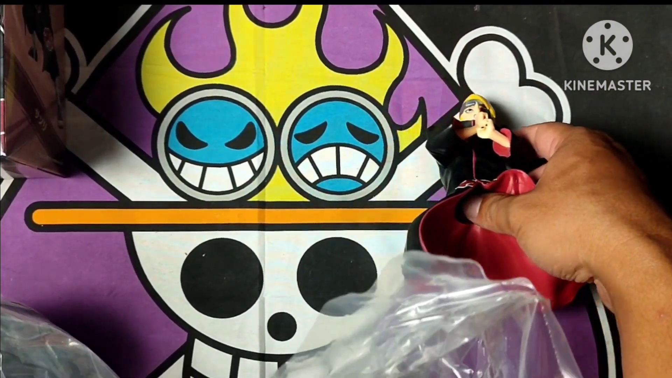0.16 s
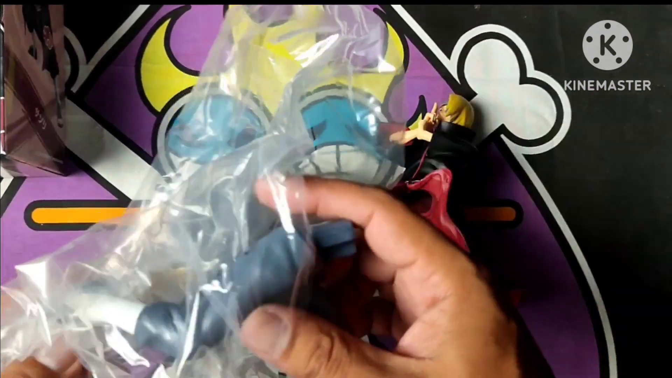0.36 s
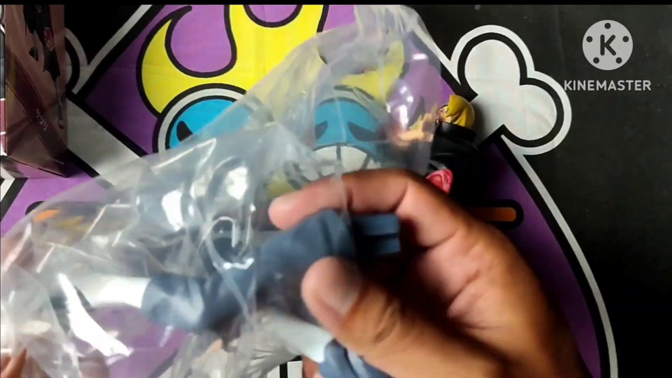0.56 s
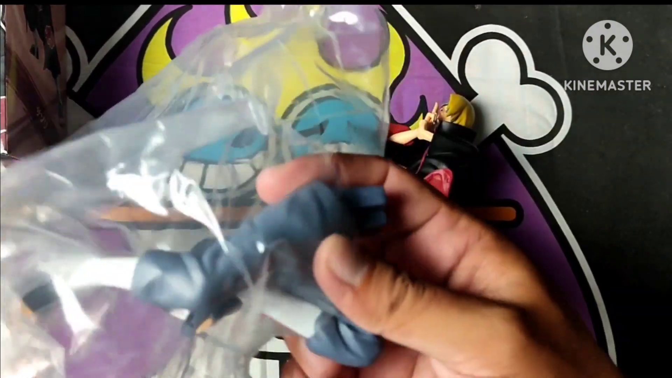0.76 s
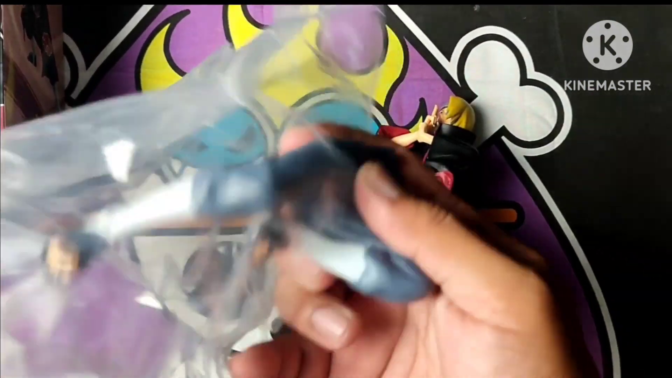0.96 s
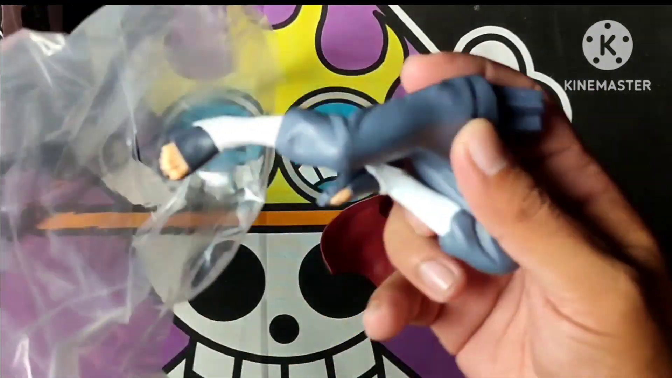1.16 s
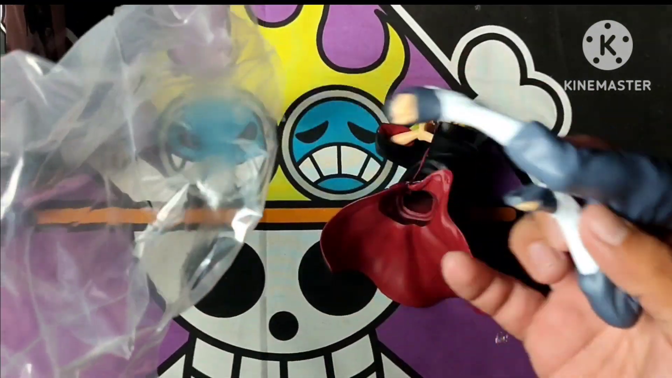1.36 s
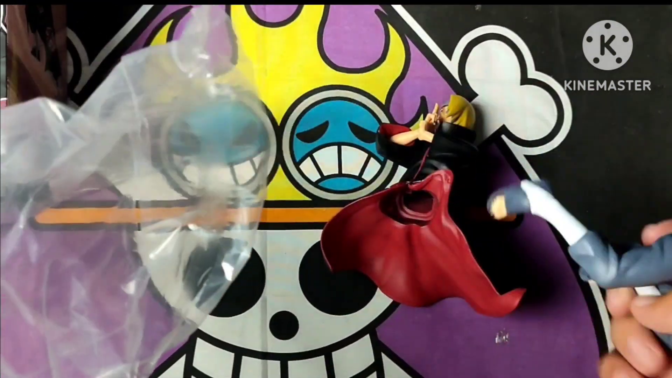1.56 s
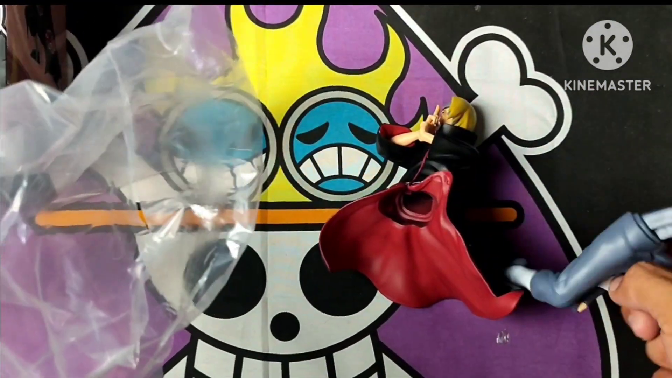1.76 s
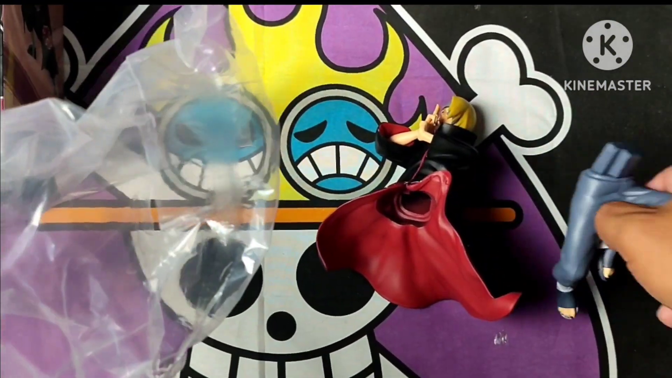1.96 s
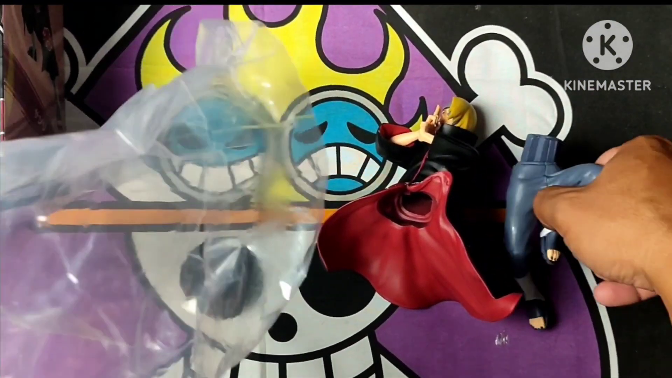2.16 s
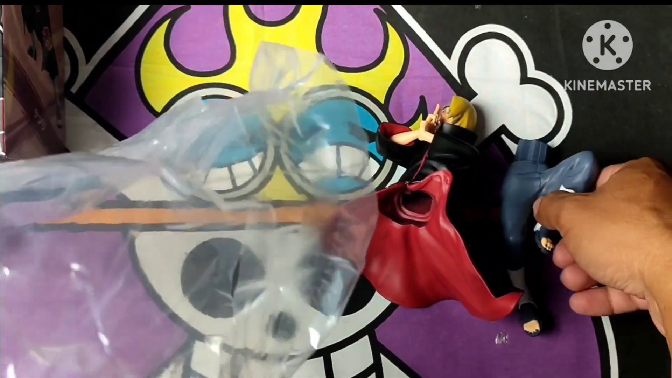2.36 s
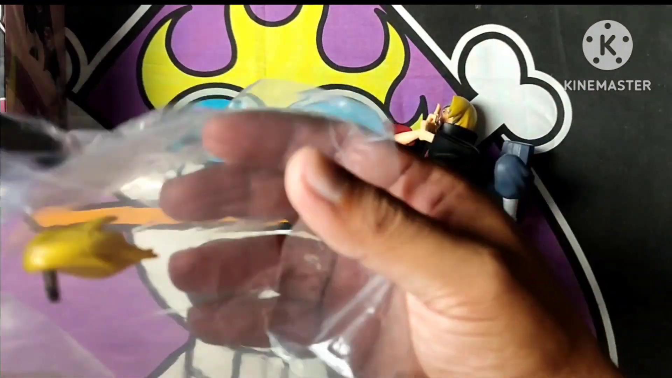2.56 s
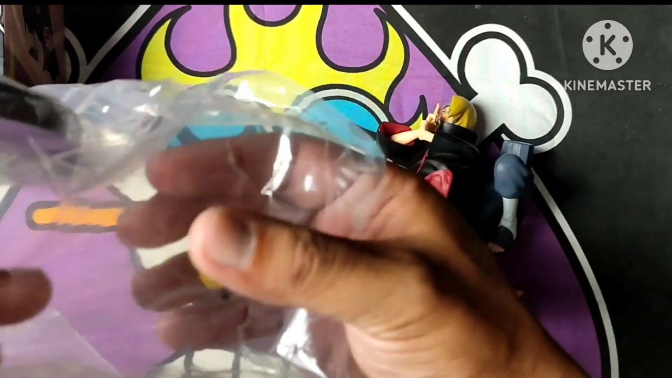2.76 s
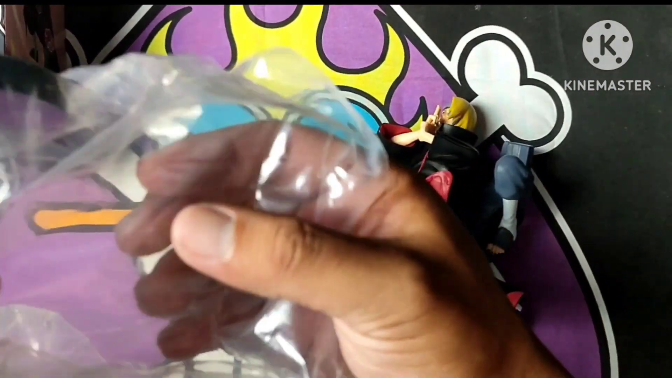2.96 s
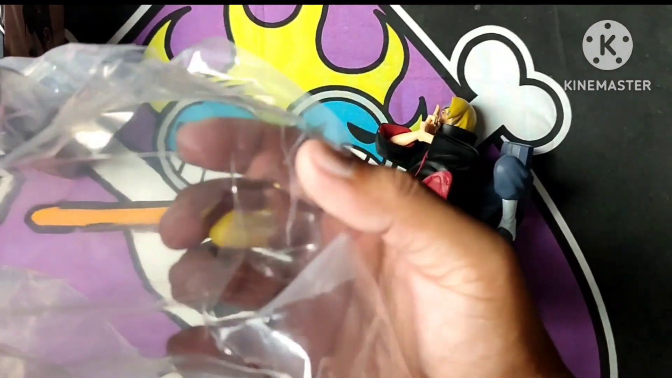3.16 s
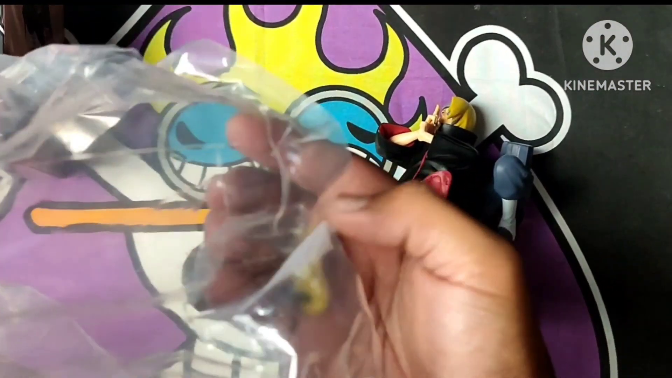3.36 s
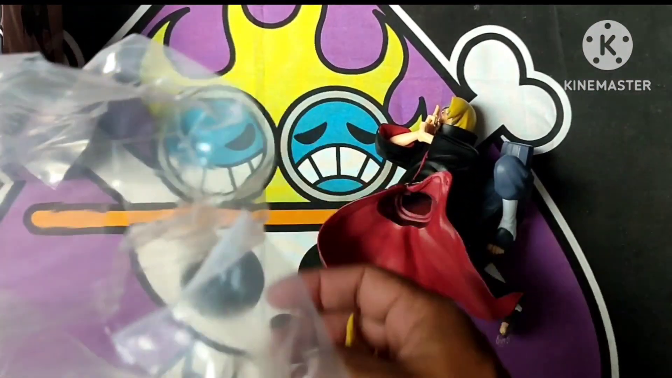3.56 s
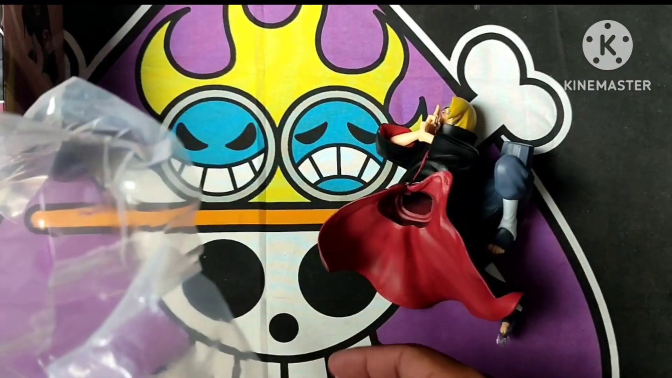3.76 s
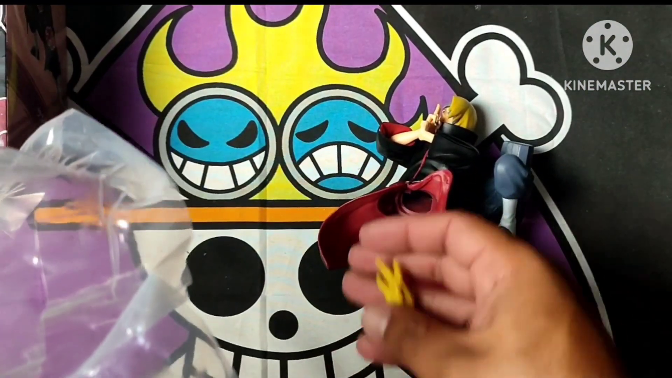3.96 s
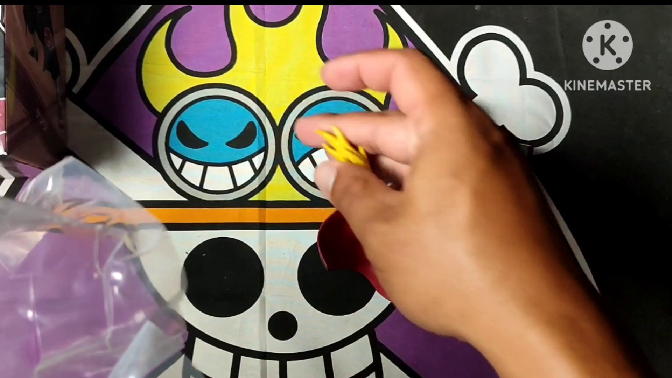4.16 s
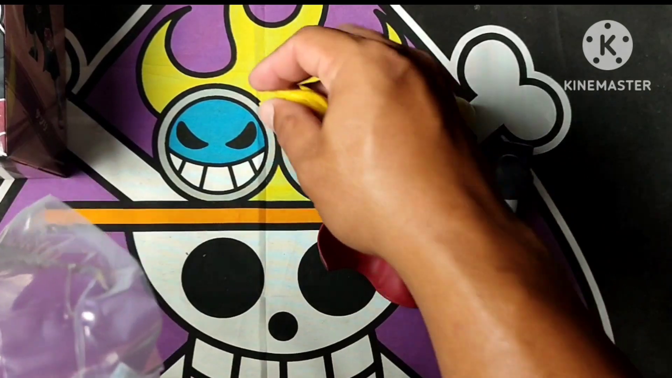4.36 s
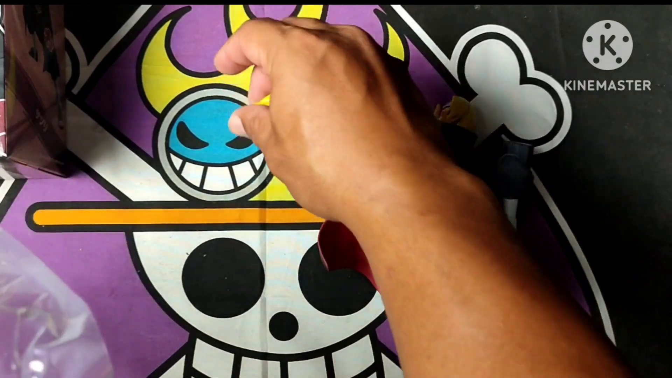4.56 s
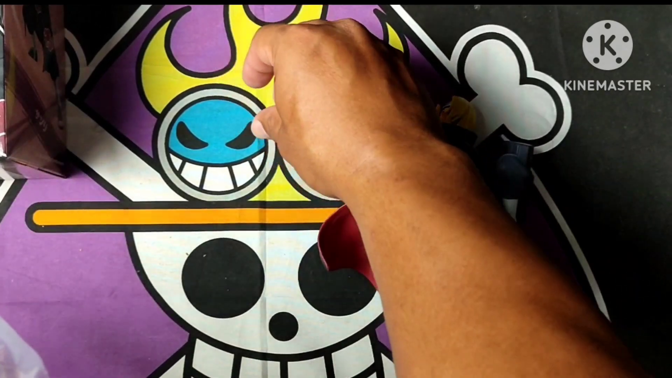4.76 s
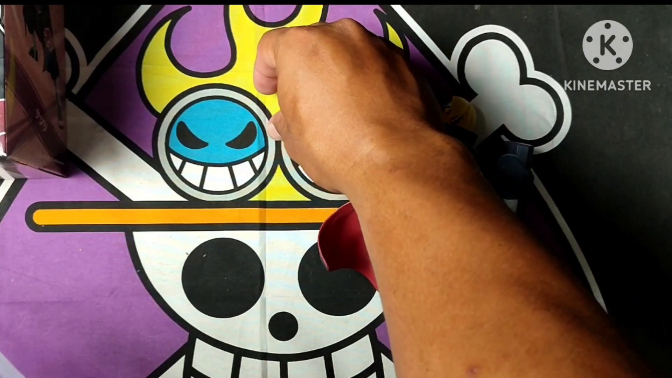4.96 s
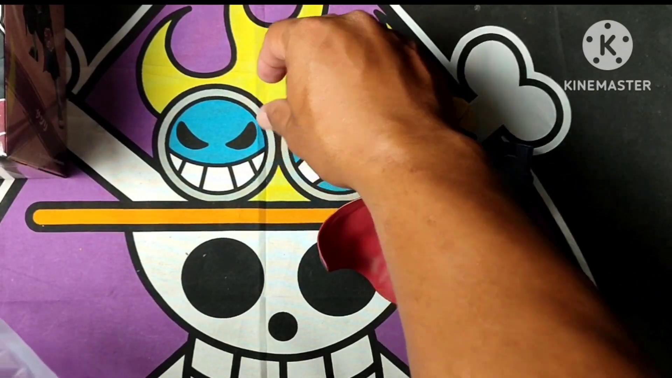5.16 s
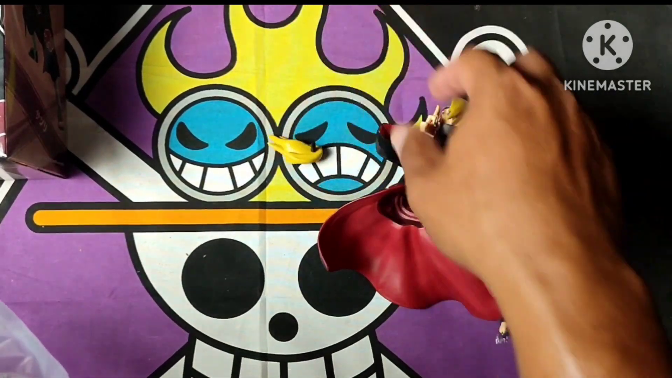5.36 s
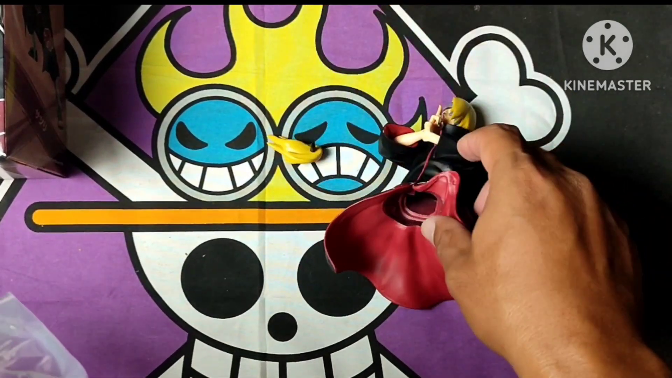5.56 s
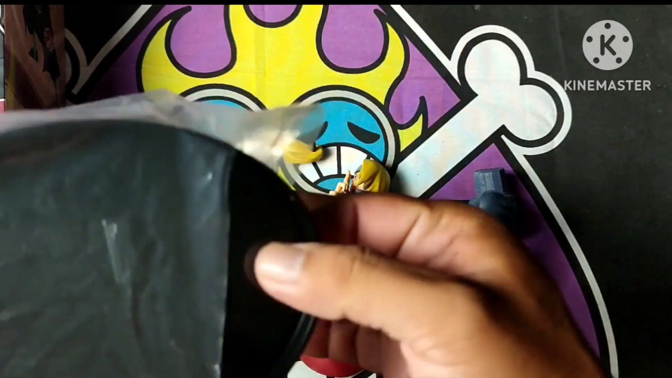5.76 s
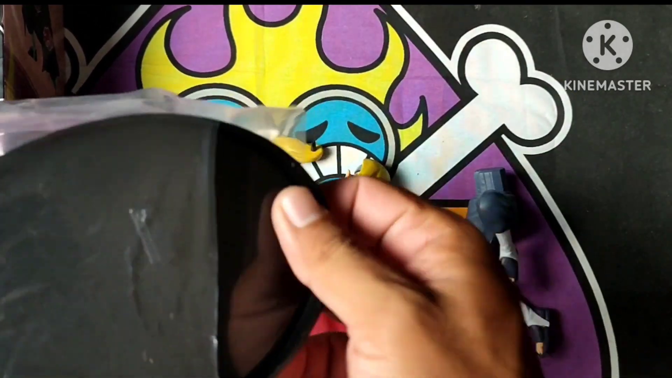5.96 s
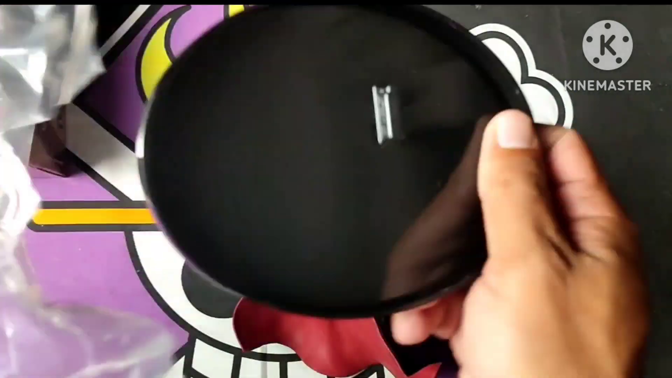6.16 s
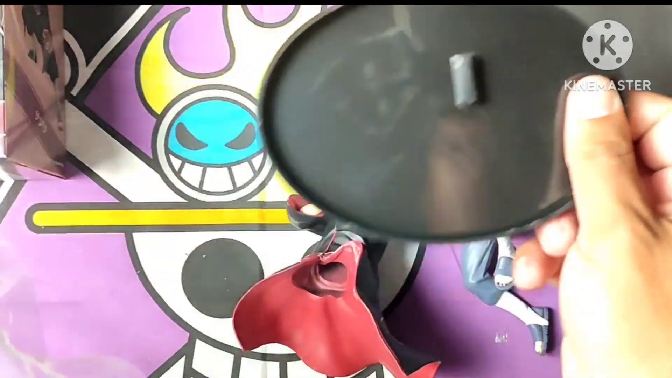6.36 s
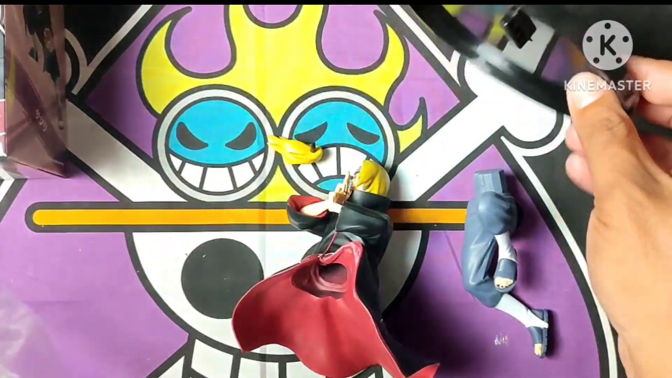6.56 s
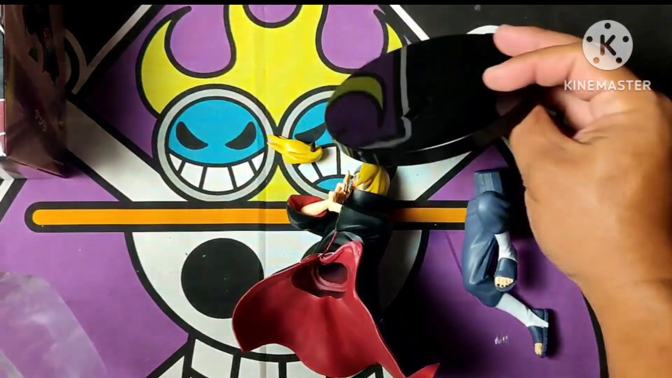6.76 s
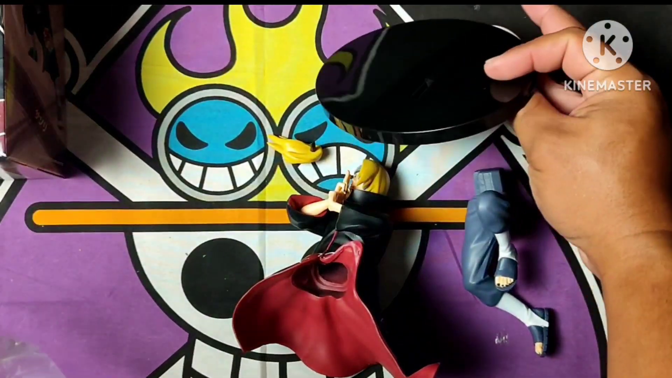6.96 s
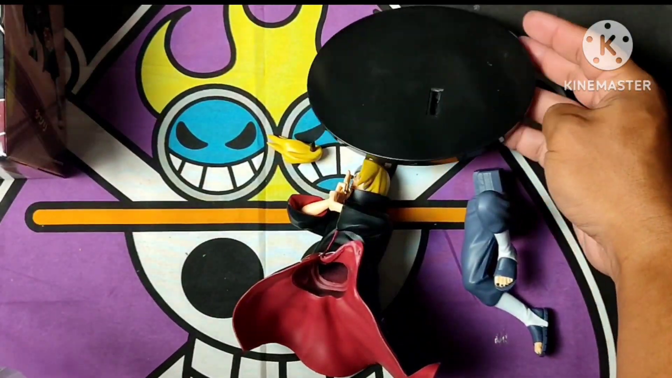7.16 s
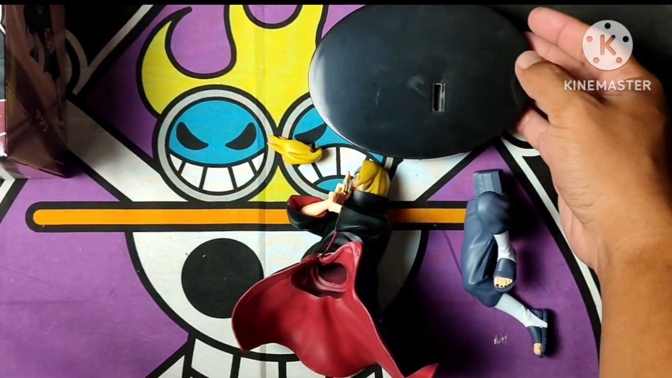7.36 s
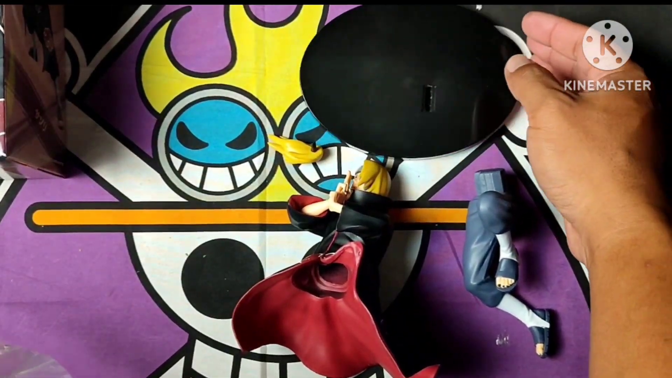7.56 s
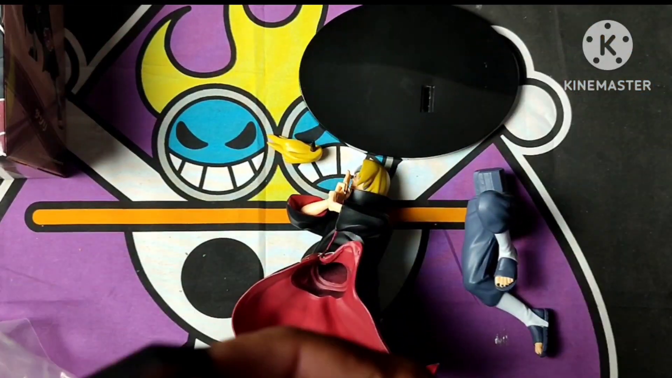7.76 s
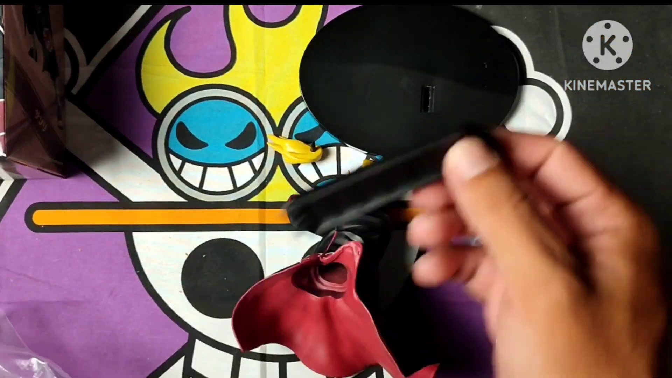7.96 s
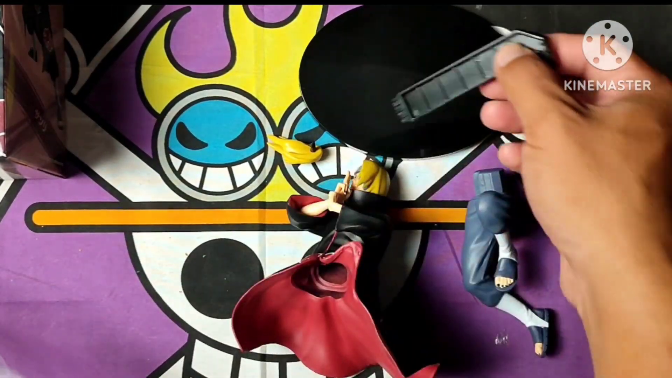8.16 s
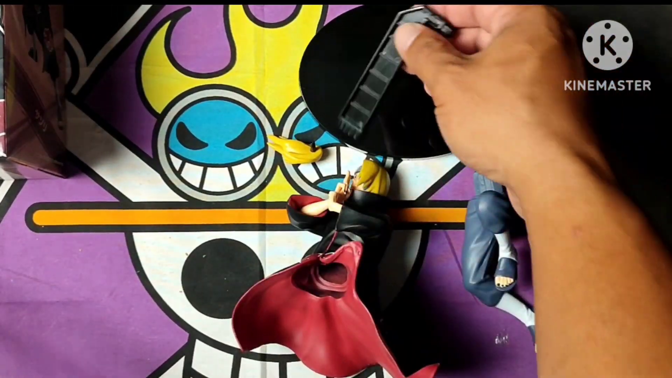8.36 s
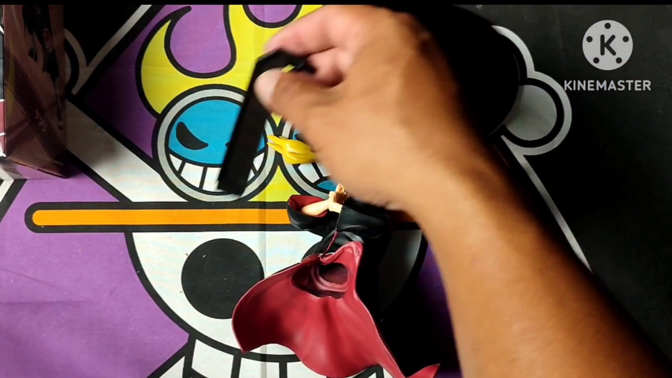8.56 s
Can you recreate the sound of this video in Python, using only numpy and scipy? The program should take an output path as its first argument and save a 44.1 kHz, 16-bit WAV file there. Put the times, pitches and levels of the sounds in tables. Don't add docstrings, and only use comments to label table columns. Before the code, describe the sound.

Indoors at a table, close and rough sound: bursts of snapping, ringing plastic film alternate with hard parts knocking a hollow tabletop. The loudest knocks distort and shake the microphone stand with a low boom. Midway it is calm, with only hiss, low rumble, a faint cricket and a small tap; later come clattering plastic, harsh bag crackle, a heavy disc thump and a last light crinkle.

```python
import sys
import numpy as np
from scipy import signal
from scipy.fft import rfft, irfft
from scipy.io import wavfile
from scipy.ndimage import uniform_filter1d

SR = 44100
rng = np.random.default_rng(int(sys.argv[2]) if len(sys.argv) > 2 else 0)


def voltage_ratio(level):
    return 10 ** (np.asarray(level, float) / 20)


def unload_wav(signal):
    wavfile.write(
        sys.argv[1],
        SR,
        np.round(np.clip(np.atleast_2d(signal).T, -1, 1) * 32767).astype(np.int16),
    )


N = 379701
TIME = np.arange(N) / SR

# frequency_hz, level_db (per Hz)
FILM = [(71, -2.5), (120, -5.5), (166, -6.5), (224, -1.5), (395, -2), (474, 1.5), (616, -9.5), (1130, -1),
        (1690, -2.5), (2250, -3), (4370, -6), (6200, -4), (7400, 1.5), (8690, -13.5), (13800, -8.5),
        (15000, -18)]
# low_hz, high_hz, rustle_layer, crease_layer (layers: 1 crisp, 2 body, 3 extremes)
ZONES = [(0, 750, 3, 0), (750, 1500, 2, 2), (1500, 2900, 2, 2), (2900, 5200, 1, 1), (5200, 8300, 1, 1),
         (8300, 20000, 1, 3)]


def level(x, db=0):
    return x * voltage_ratio(db) / np.sqrt(np.mean(x ** 2))


def colour(x, points, lo_hz=0, hi_hz=SR):
    hz = np.maximum(np.arange(4097) * SR / 8192, 1)
    point_hz, point_db = np.array(points).T
    db = np.interp(np.log(hz), np.log(point_hz), point_db)
    db = db - 10 * np.log10((1 + (lo_hz / hz) ** 6) * (1 + (hz / hi_hz) ** 6))
    cepstrum = irfft(db * np.log(10) / 20)
    cepstrum[1:4096] *= 2
    cepstrum[4097:] = 0
    impulse = irfft(np.exp(rfft(cepstrum)))[:4096]
    return signal.oaconvolve(x, impulse)[:len(x)]


def walk(rate):
    k = int(SR / rate)
    held = np.repeat(rng.standard_normal(N // k + 1), k)
    return 1.3 * uniform_filter1d(uniform_filter1d(held, k), k)[:N]


def echo(t60, wet_db):
    t = TIME[1:SR // 4]
    tail = rng.standard_normal(len(t)) * voltage_ratio(-60 * t / t60)
    return np.concatenate([[1], tail * voltage_ratio(wet_db) / np.sqrt(np.sum(tail ** 2))])


def smear(x, t60, wet_db):
    keep = voltage_ratio(-120 / (t60 * SR))
    energy = signal.lfilter([0, 1 - keep], [1, -keep], x ** 2)
    return x + voltage_ratio(wet_db) * np.sqrt(energy) * rng.standard_normal(len(x))


def ring(modes, push, rattle=0):
    t = TIME[:SR // 4]
    free = sum(-voltage_ratio(db - 60 * t / t60) * np.sin(2 * np.pi * f * t) for f, db, t60 in modes)
    struck = signal.fftconvolve(free + rattle, push)[:len(t)]
    return struck / np.abs(struck).max()


def background():
    # start_s, cricket_db, hiss_gain_db, rumble_db
    around = [(0.0, -51, 3.5, -45), (0.43, -50.5, -0.5, -49.5), (0.62, -75, 3.5, -40.5),
              (1.15, -58, -10, -50.5), (1.5, -60, -2, -48.5), (1.87, -56, -0.5, -46),
              (2.18, -55.5, -0.5, -46), (2.76, -67, 2.5, -47.5), (3.33, -60.5, -3, -46.5),
              (3.69, -56, 0.5, -41.5), (5.06, -52.5, 5, -47), (5.25, -58, -2, -52), (5.6, -55.5, -1.5, -44),
              (6.2, -76, -3, -52), (6.7, -56, 0, -45), (7.05, -56.5, 2, -41), (7.24, -60, 6.5, -47),
              (7.33, -57, 1.5, -46), (7.65, -49, 3.5, -45.5), (7.9, -62, 1.5, -48)]
    # frequency_hz, level_db (per Hz)
    hiss_spectrum = [(59, -33), (100, -2), (159, -8), (227, -1.5), (279, -9), (524, -10), (1460, -15.5),
                     (2690, -16.5), (4000, -20.5), (5150, -21.5), (5840, -15.5), (7670, -16), (8520, -29),
                     (13800, -19), (15000, -27.5)]
    rumble_spectrum = [(7.1, -19), (12, -16.5), (17, 11.5), (27, -12.5), (48, -9.5), (70, -11.5),
                       (160, -28.5), (210, -54), (350, -120)]
    # frequency_hz, level_db
    trill_partials = [(5238, -78), (5356, -77), (5480, -64), (5539, -67), (5599, -73), (5660, -71),
                      (5720, -62), (5780, -60), (5841, -73), (5900, -63), (5959, -67), (6019, -70),
                      (6140, -75), (6261, -74), (6320, -75)]
    s, *columns = np.transpose(around)
    cricket_db, hiss_db, rumble_db = (np.interp(TIME, s, c) for c in columns)
    hiss = level(colour(rng.standard_normal(N), hiss_spectrum), -54.5) * voltage_ratio(hiss_db + .8 * walk(6))
    rumble = level(colour(rng.standard_normal(N), rumble_spectrum)) * voltage_ratio(rumble_db + 1.33 * walk(3.42))
    drift = 0.34 * walk(19)
    trill = np.zeros(N)
    for hz, db in trill_partials:
        swell = 1 + 0.12 * walk(8.4)
        phase = 2 * np.pi * hz * TIME + 1.9 * rng.random() + drift + 0.53 * walk(31)
        trill += voltage_ratio(db) * swell * np.sin(phase)
    under = voltage_ratio(-12 + 2.0 * walk(9)) * np.sin(2 * np.pi * 2735 * TIME + 0.8 * walk(40))
    over = colour(rng.standard_normal(N), [(10300, -24), (11400, -9), (12500, -29)])
    over = level(over, -11.5) * voltage_ratio(2.5 * walk(13))
    return hiss + rumble + (level(trill) + under + over) * voltage_ratio(cricket_db)


THUMP_LAG_S = 0.00164


def rocking():
    # frequency_hz, level_db, t60_s
    sway = [(50.4, 3, 0.12), (80, 11, 0.11)]
    # start_s, peak_db
    shoves = [(0.104, -22.5), (1.073, -30), (1.285, -47), (1.79, -8), (1.82, -17), (1.897, -32),
              (2.267, -21), (2.442, -22), (5.543, -27), (5.56, -22), (7.218, -38), (7.269, -30),
              (7.521, -42), (7.661, -43)]
    out = np.zeros(N + SR)
    rock = ring(sway, np.hanning(300))
    for t0, db in shoves:
        out[int((t0 + THUMP_LAG_S) * SR):][:len(rock)] += voltage_ratio(db) * rock
    return out[:N]


def thumps():
    # start_s, peak_db, pitch_hz
    table_blows = [(0.105, -25.5, 118), (1.074, -26, 129), (1.285, -33, 323), (1.7806, -4, 161),
                   (1.79, -5.5, 205), (1.8184, -19.5, 194), (1.897, -27, 212), (1.914, -31, 130.8),
                   (2.267, -13.5, 292.5), (2.2768, -17, 208), (2.2826, -23, 261), (2.423, -30, 303),
                   (2.4314, 3.5, 212), (2.357, -38, 420), (2.4411, -9.5, 276), (3.851, -36, 192),
                   (5.055, -41, 323), (5.181, -25.5, 331), (5.19, -33, 300), (5.217, -11.5, 404),
                   (5.229, -18, 237), (5.266, -25, 238), (5.429, -39, 167), (5.5337, -23.5, 215),
                   (5.5426, -21.5, 195), (5.612, -28, 215),
                   (6.998, -1, 234), (7.089, -34.5, 223), (7.165, -38, 268), (7.218, -20.5, 240),
                  (7.243, -15, 217.4), (7.267, -21, 200), (7.4, -35, 167), (7.5218, -31.5, 225),
                  (7.547, -37, 190), (7.5525, -32, 189), (7.558, -27.5, 188), (7.635, -29, 231),
                  (7.648, -24.5, 295), (7.6603, -12.5, 257)]
    # ratio (to the thump pitch), level_db, t60_s
    table_modes = [(.85, -6, 0.14), (1.0, 4.5, 0.11), (1.2, 3.5, 0.046), (1.75, -7.5, 0.08),
                   (2.7, -12.5, 0.037), (3.6, -30, .05)]
    out = np.zeros(N + SR)
    for t0, db, thump_hz in table_blows:
        cycle = np.arange(0, 1, 1.73 * thump_hz / SR)
        push = np.sin(2 * np.pi * cycle) * (1 - 0.83 * cycle)
        shorter = 1 / (1 + 0.97 * voltage_ratio(2 * db))
        blow = voltage_ratio(db) * ring(np.array(table_modes) * [thump_hz, 1, shorter], push)
        out[int((t0 + THUMP_LAG_S) * SR):][:len(blow)] += blow
    return out[:N]


def rustle():
    # start_s, crinkle_db, slack_db (how far the film's low body joins in)
    pulls = [
        [(0.35, -38.5, -4), (0.415, -48.5, -1.5), (0.45, -39.5, -4), (0.535, -40.5, -4.5), (0.885, -34.5, -6),
         (0.97, -41.5, -11.5), (1.075, -37.5, 2), (1.184, -52.5, -1)],
        [(1.29, -54, 2), (1.378, -43.5, -10), (1.484, -43.5, -2.5), (1.54, -53, -4), (1.77, -49, 0.5)],
        [(2.53, -53, -1), (2.626, -35.5, -2.5), (2.794, -39.5, -11), (2.812, -46.5, -3.5), (2.936, -43, 0),
         (3.002, -58, 0)],
        [(5.66, -39, -5), (5.706, -45.5, -3), (5.775, -25, -3.5), (5.835, -27.5, -2.5), (5.9, -44, -4.5),
         (6.036, -39, -6.5), (6.196, -39, -4), (6.296, -54.5, 0)],
        [(7.705, -46, -16), (7.729, -43.5, -6.5), (7.913, -47, -7), (7.97, -82, -7)],
    ]
    # peak_s, crinkle_db, rise_s, fall_s, slack_db
    twitches = [(.13, -55, .01, .03, -15), (.316, -52.5, 1, .024, -4), (1.224, -48, 0.26, 0.11, -0.5),
                (1.27, -37, .024, 0.051, -6), (1.491, -35, .034, 0.12, -20), (1.61, -46, .4, .14, -14),
                (2.16, -38.5, 0.019, 0.12, -8), (2.34, -50, 0.47, 0.46, -2), (2.45, -38, 0.064, 0.087, -15),
                (3.132, -46, 0.45, 0.058, 0), (3.35, -54.5, 2, 0.31, -2), (3.426, -46.5, 0.054, 0.1, -6),
                (5.214, -46, 0.23, .004, 2.5), (5.671, -33.5, .05, 0.1, -8),
                (6.349, -39.5, .006, 0.24, -2.5), (6.392, -41, 0.22, 0.14, -4),
                (6.474, -44.5, .04, 0.21, -9), (7.054, -51.5, 0.67, 0.071, -13),
                (7.65, -48.5, 0.26, .004, -1), (7.71, -31, .02, 0.083, -22)]
    span_db = 40
    when, size, sign, *lean = rng.random((24000, 3 + len(ZONES))).T
    at = (when * N).astype(int)
    size_db = -2.8 * np.log(size + 0.01) + 0.7 * walk(60)[at] + 2.0 * walk(200)[at]
    size = np.sign(sign - .5) * voltage_ratio(size_db)
    swarm = np.zeros((4, N))
    for (lo, hi, layer, _), own in zip(ZONES, lean):
        lean_db = 16.4 * (own - .5) + 1.15 * walk(70)[at] + 2.27 * walk(18)[at]
        clicks = np.bincount(at, size * voltage_ratio(lean_db), N)
        swarm[layer] += colour(level(smear(clicks, 0.036, -1.2)), FILM, lo, hi)
    moves = list(pulls)
    for s, db, rise, fall, slack in twitches:
        moves.append([(s - rise, db - span_db, slack), (s, db, slack), (s + fall, db - span_db, slack)])
    out = np.zeros(N)
    for layer in (1, 2, 3):
        db = np.full(N, -150.)
        for s, crinkle_db, slack in map(np.transpose, moves):
            share_db = [0 * slack, slack, -1.5 + 1.21 * slack][layer - 1]
            move_db = crinkle_db + np.minimum(share_db, 4)
            db = np.maximum(db, np.interp(TIME, s, move_db, -150, -150))
        out += level(swarm[layer]) * voltage_ratio(db)
    return out


def creases():
    # start_s, peak_db, body_db (re peak)
    bag_creases = [(0.356, -26, -17), (0.388, -20.5, -26), (0.434, -19, -6), (0.463, -24.5, -33),
                   (0.543, -18.5, -26), (0.646, -21, -2), (0.7348, -21, -3.5), (0.7687, -25, -22),
                   (0.869, -18, -2), (0.9415, -23.5, -20), (0.981, -25, -9), (1.0261, -25, 0),
                   (1.074, -22.5, 0), (1.218, -29, -19), (1.2687, -31.5, -15), (1.342, -23, -8),
                   (1.391, -22, -9), (1.4266, -25.5, -12), (1.474, -34, -9), (1.4882, -19.5, -10),
                   (1.5593, -28.5, -4), (1.6018, -32, -15), (1.6541, -28, -4), (1.709, -31, -22),
                   (1.744, -27, -21), (1.782, -27, -10), (2.3003, -34, -15), (2.332, -19.5, -22),
                   (2.394, -25.5, -20),
                   (2.5336, -25.5, -24), (2.5965, -25, 3), (2.614, -19, -4), (2.674, -17.5, -5),
                     (2.718, -23.5, 1), (2.774, -24, -5.5), (2.884, -22.5, -3), (3.035, -31.5, 0),
                     (3.126, -26.5, -23), (3.269, -28.5, -13), (3.312, -31.5, -4), (5.219, -24.5, 4),
                     (5.668, -23, -3), (5.742, -20.5, -16), (5.7603, -20, -24), (5.865, -16.5, -24),
                     (5.9319, -23, -5), (5.9955, -20.5, -4.5), (6.027, -18, -9), (6.0628, -14.5, -13),
                     (6.1001, -19, 0), (6.1865, -16.5, 7), (6.3462, -27.5, -6), (6.4754, -20, -11.5),
                     (7.0293, -39, -6), (7.2434, -12, 4), (7.7076, -45, -19), (7.808, -23.5, -9),
                     (8.4883, -34, -5),
                   (0.3744, -25, -10), (0.3944, -28, -11), (0.5004, -25, -13), (0.5574, -22, -10),
                     (0.612, -24, -2), (0.6214, -29, -8), (0.6344, -24, -10), (0.69, -26, -10),
                     (0.6974, -23.5, -13), (0.7434, -25, -10), (0.7677, -24, -13), (0.8022, -27, -7),
                     (0.8137, -22, -13), (0.8334, -28, -6), (0.891, -21, -10), (0.8964, -19, -3),
                     (0.9884, -24.5, -15), (1.0621, -25, -7), (1.1478, -34, -10), (2.313, -23, -13),
                     (2.359, -28, -10), (2.5622, -31, -8), (2.613, -21, -17), (2.6364, -22, -8),
                     (2.6575, -20, -7), (2.7677, -27, -7), (2.7854, -24, -3), (2.841, -34, -10),
                     (2.9114, -28, -10), (2.9328, -30, -8), (2.9692, -32.5, -8), (5.7284, -26, 0),
                     (5.9736, -23, -1), (6.0055, -22, -14), (6.0384, -27, -10), (6.0764, -26, -4),
                     (6.1412, -25, -10), (6.3776, -28, -7)]
    crisp_s = [1.343, 3.1255, 6.4754, 7.7076]
    start_s, peak_db, body_db = np.transpose(bag_creases)
    crisp = np.abs(start_s[:, None] - np.array(crisp_s)).min(axis=1) < .005
    top_db = -12.5 + 0.1 * (peak_db + 25) + 15 * crisp
    shares_db = [None, 0 * peak_db, np.minimum(body_db, 0), np.minimum(top_db, 0)]
    age = TIME[:400]
    swell = (age + .0003) * np.exp(-age / 0.0012)
    snaps = rng.standard_normal((len(start_s), len(age))) * swell
    snaps /= np.sqrt(np.sum(snaps ** 2, axis=1, keepdims=True))
    out = np.zeros(N)
    for lo, hi, _, layer in ZONES:
        if not layer:
            continue
        snap_db = peak_db + shares_db[layer] + 1.75 * rng.standard_normal(len(start_s))
        if lo == 2900:
            snap_db = snap_db + .25 * (body_db + 8)
        bursts = np.zeros(N + 400)
        for s, db, snap in zip(start_s, snap_db, snaps):
            bursts[int(s * SR):][:len(snap)] += snap * voltage_ratio(db)
        impulse = 1. * (TIME[:2000] == 0)
        unit = .33 * np.linalg.norm(colour(impulse, FILM, lo, hi))
        zone_db = 1.0 - 1.47 * (hi < 6000)
        out += colour(smear(bursts[:N], 0.12, -6.5), FILM, lo, hi) * voltage_ratio(zone_db) / unit
    return out


def rings():
    # start_s, peak_db, pitch_hz
    cupped = [(0.4344, -23, 2670), (0.4623, -18.5, 3100), (0.5003, -25, 2930), (0.6903, -27, 1610),
              (0.7677, -24, 4580), (0.8345, -25, 1550), (0.8685, -27, 1140), (0.8914, -22, 4750),
              (0.9416, -29, 1760), (0.9797, -26, 2720), (0.9892, -26, 1540), (1.0266, -24, 4110),
              (1.063, -23, 1880), (1.3414, -39, 3370), (1.5584, -35, 1830), (2.5613, -31, 2460),
              (2.6125, -23, 2730), (2.674, -17, 3270), (2.7676, -30, 3640), (2.8876, -19.5, 4530),
              (2.9705, -28, 2720), (3.1243, -30, 1950), (5.7399, -21, 4040), (5.931, -24, 2650),
              (6.007, -25, 2080), (6.039, -25, 1310), (6.0993, -21, 2470), (6.1404, -29, 1030),
              (6.1842, -22, 1030), (6.3584, -28, 4720)]
    out = np.zeros(N)
    for t0, db, hz in cupped:
        t60 = 46 / hz
        tone = ring([(hz, 0, t60), (hz * 1.13, -4.0, t60)], rng.standard_normal(40))
        out[int(t0 * SR):][:len(tone)] += voltage_ratio(db - 4) * tone
    return out


def clacks():
    # frequency_hz, level_db, t60_s
    legs = [(1.783, -27, 0.21), (1.792, -26, 0.042), (1.856, -38, 0.07), (1.897, -39, 0.12),
            (2.269, -24.5, 0.52), (2.433, -12, 0.16), (2.442, -32, 0.17)], [(510, -4, .05),
            (803, -6, 0.059), (1025, -3, 0.033), (1390, 4, 0.027), (1710, 1, 0.035), (2240, -16, .03)]
    figure = [(5.184, -33, 0.5), (5.208, -25, 0.42), (5.22, -8.5, 0.061), (5.232, -20, 0.047),
              (5.2385, -29, .1), (5.267, -17, 0.095), (5.2705, -12, 0.11), (5.2735, -14, .1),
              (5.284, -38, .08), (5.4305, -21.5, 0.33)], [(706, -11, 0.057), (953, 5.5, 0.035),
              (1260, -10, 0.05), (1370, 2, 0.029), (1550, -10, .035), (1725, -3, 0.049), (1922, -9, 0.057),
              (2165, -5, 0.043), (2330, -19, 0.046), (3180, -17, .06), (4150, -13, 0.04)]
    disc = [(6.988, -42, 0.028), (7.0025, -31, 0.026), (7.231, -32, 0.054), (7.244, -8, 0.024),
            (7.268, -15.5, 0.1)], [(630, -11, 0.2), (773, -8, 0.054), (1068, -9, 0.19), (1180, -10, 0.1),
            (1300, -11, 0.11), (1430, 5.5, 0.07), (1683, -0.5, 0.17), (2100, -6, .13), (2180, -8, 0.22),
            (2650, 2.5, 0.049), (3170, -13, 0.14), (3820, -12, .05), (4840, -14, 0.1), (6920, -6, .07)]
    rim = [(7.001, -6, 0.23), (7.015, -31, 0.35), (7.028, -34, 0.18), (7.221, -26, 0.2), (7.656, -21, 0.25),
           (7.664, -25, .3)], [(485, -9, 0.099), (627, -1, .06), (778, 3.5, 0.036), (958, -7, 0.045),
           (1281, -4, .07), (1390, -3, 0.051), (2100, -21, .02)]
    chip = [(3.033, -30.5, 0.083), (3.853, -22, 0.033)], [(1630, 0, 0.042), (1720, 2, 0.037),
            (1880, 0, 0.034)]
    crowd_spectrum = [(600, 1.5), (2100, -3.5), (2800, -17.0), (9000, -33.0)]  # (Hz, dB)
    out = np.zeros(N + SR)
    for (hits, modes), dense_db in zip((legs, figure, disc, rim, chip), (-0.5, -0.5, -1.5, 2.0, -6.5)):
        for t0, db, contact_ms in hits:
            crowd = level(colour(rng.standard_normal(SR // 4), crowd_spectrum, 510))
            crowd = crowd * voltage_ratio(dense_db - 60 * TIME[:SR // 4] / 0.095)
            t = TIME[:400] / (max(contact_ms, .02) / 1000)
            push = t ** 2 * np.exp(-1.4 * t)
            clack = signal.fftconvolve(ring(modes, push, crowd), echo(0.15, -18.5))
            out[int(t0 * SR):][:len(clack)] += voltage_ratio(db) * clack
    return out[:N]


def knocks():
    blows = rocking() + thumps() + clacks()
    return signal.sosfilt(signal.butter(2, 35, "hp", fs=SR, output="sos"), blows)


def squeaks():
    # start_s, length_s, level_db
    whistles = [(3.607, 0.17, -62), (3.756, 0.18, -63)]
    out = np.zeros(N)
    for t0, length, db in whistles:
        t = TIME[:int(length * SR)]
        hz = 11300 + 2200 * np.exp(-(t / 0.055) ** 2) + 170 * walk(300)[:len(t)]
        loudness = voltage_ratio(db + 2.0 + 5.0 * walk(60)[:len(t)]) * np.hanning(len(t)) ** .5
        out[int(t0 * SR):][:len(t)] += loudness * np.sin(2 * np.pi * np.cumsum(hz) / SR)
    return out


def squeals():
    # start_s, length_s, level_db
    slides = [(7.04, 0.042, -46.5), (5.8, 0.041, -57), (4.5, 0.043, -50), (5.227, 0.024, -46)]
    slide_hz = [6900, 2380, 3650, 4150]
    out = np.zeros(N)
    for (t0, length, db), hz in zip(slides, slide_hz):
        t = TIME[:int(length * SR)]
        loudness = voltage_ratio(db + 2.9 * walk(250)[:len(t)]) * np.hanning(len(t)) ** .5
        phase = 2 * np.pi * hz * t + .6 * walk(150)[:len(t)]
        out[int(t0 * SR):][:len(t)] += loudness * np.sin(phase)
    return out


def scene():
    return (background() + knocks() + rustle() + creases() + rings() + squeaks() + squeals())[None]


def band_limit(x):
    return signal.sosfilt(signal.butter(12, 15610, fs=SR, output="sos"), x)


def record(dry):
    # out_s, in_s
    splices = [(.322, .352), (2.499, 2.530), (5.636, 5.658), (7.676, 7.705)]
    x = np.clip(dry, -1, 1)
    for out_s, in_s in splices:
        gate = np.maximum((out_s - TIME) / .002, (TIME - in_s) / .003)
        x = x * np.clip(gate, .004, 1)
    x = signal.sosfilt(signal.ellip(6, .3, 29, 14300, fs=SR, output="sos"), x)
    return band_limit(x)


dry = scene()
out = record(dry)
unload_wav(out)
```